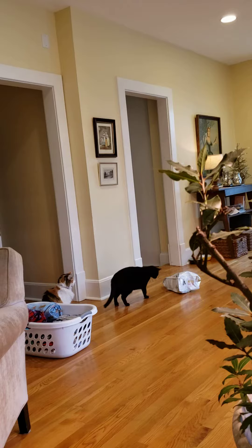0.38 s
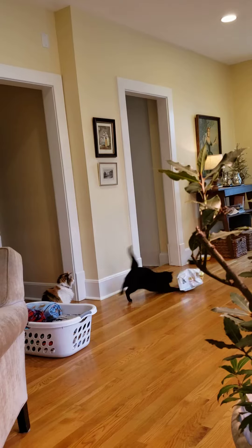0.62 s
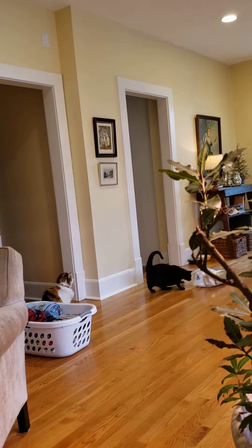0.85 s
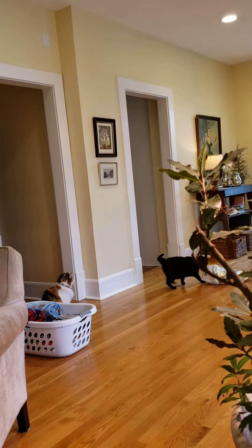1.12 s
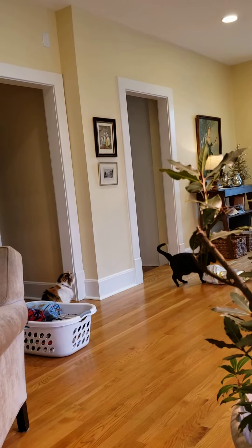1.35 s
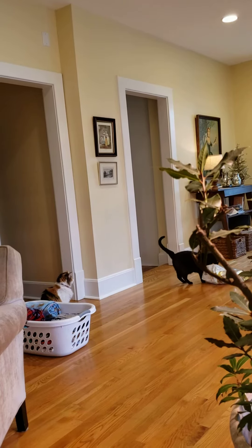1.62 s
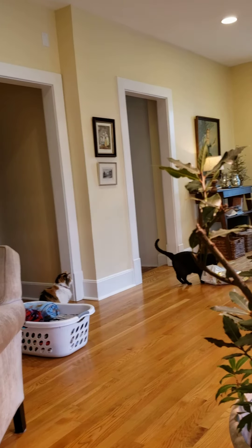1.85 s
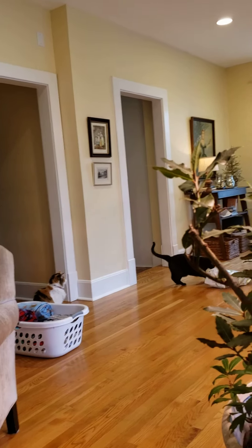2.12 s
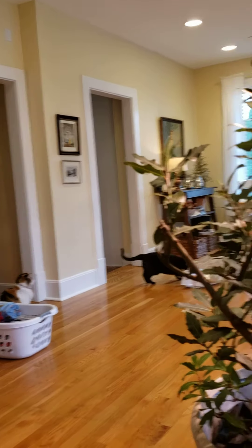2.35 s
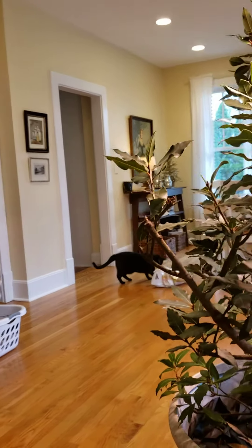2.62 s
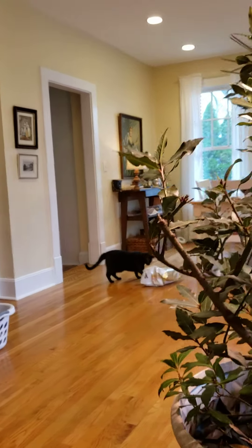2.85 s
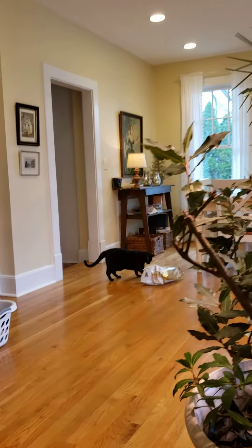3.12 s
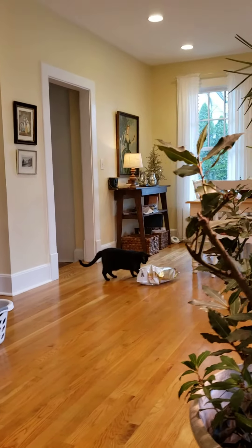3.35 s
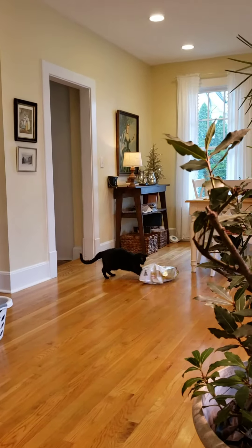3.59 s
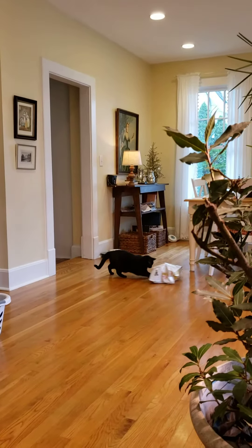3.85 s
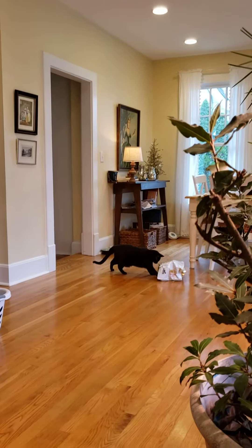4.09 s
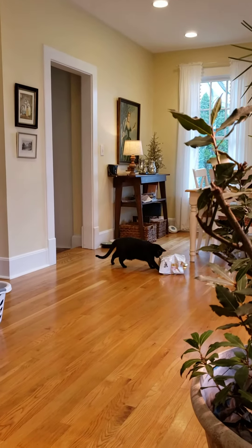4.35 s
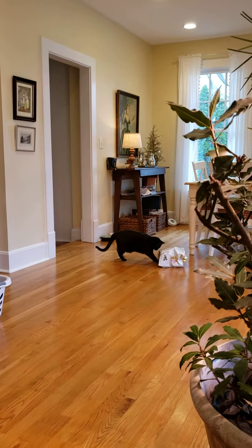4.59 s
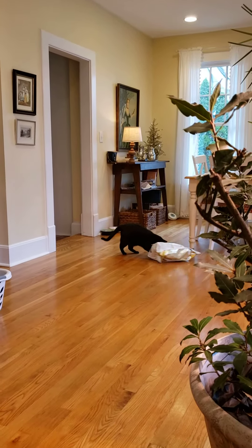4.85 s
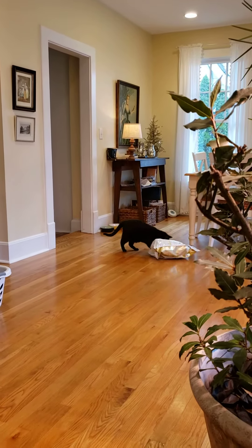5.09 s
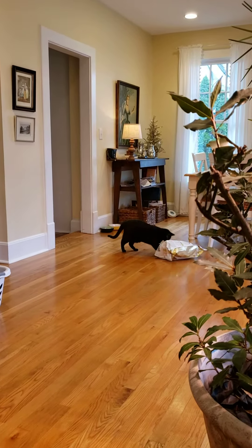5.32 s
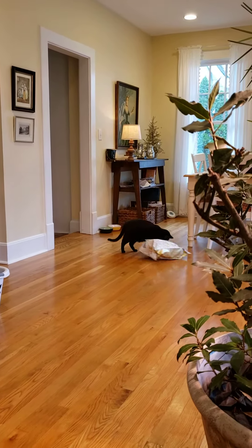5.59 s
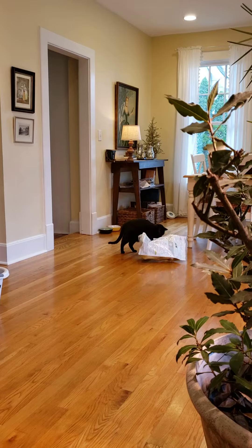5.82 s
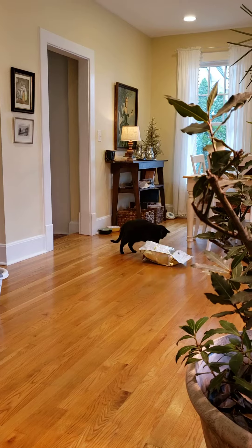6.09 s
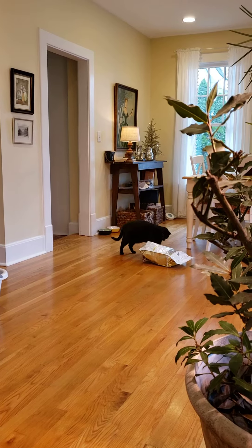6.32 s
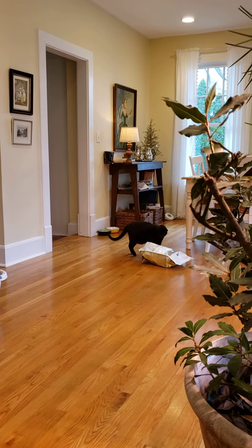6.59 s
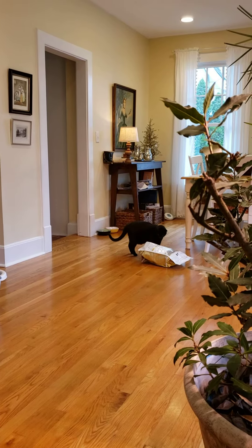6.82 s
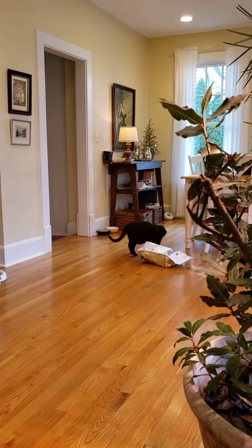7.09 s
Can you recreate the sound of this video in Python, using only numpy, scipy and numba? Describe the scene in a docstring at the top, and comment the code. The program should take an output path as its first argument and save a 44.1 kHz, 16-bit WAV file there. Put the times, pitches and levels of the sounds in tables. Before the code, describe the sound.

Sudden crinkly bursts, snaps and hollow flaps of a film bag batted over floorboards by a cat, with near-quiet gaps over faint house rumble.

```python
"""On the wooden floor of a bare, lively room, a cat pounces on a nearly empty foil-lined food bag and shoves it.
Creases in the film pop by the thousand as short damped rings, the big panels flap and boom, folds snap
under a paw, seams sing as they drag. The room smears the bag with decaying noise echoes; small ringing ticks join.
Beneath lie a house rumble, a low hum in three narrow bands and the microphones' hiss, made of shaped noise.
All of it is heard from a phone some metres off."""
import sys
import numpy as np
from scipy import signal
from scipy.fft import rfft, irfft, next_fast_len
from scipy.io import wavfile
from scipy.ndimage import uniform_filter1d
from numba import njit

SR = 44100
rng = np.random.default_rng(int(sys.argv[2]) if len(sys.argv) > 2 else 0)


def convert_level_to_amplitude(level_db):
    """Map a level in decibels to its linear amplitude factor."""
    exponent = np.asarray(level_db, float) / 20
    return 10 ** exponent


def master_out(mix):
    """Clip the mix to full scale and print it as 16-bit PCM to the path in sys.argv[1]."""
    frames = np.transpose(np.atleast_2d(mix))
    ceiling = np.clip(frames, -1, 1)
    pcm = np.round(ceiling * 32767).astype(np.int16)
    wavfile.write(sys.argv[1], SR, pcm)


N = 317343

# Bag levels are ahead of the room and of the bag's colour.
# The cat hits the bag and the film starts at once. Each row: start in seconds, crackle in dB, push in seconds,
# panel flapping in dB above the crackle, fizz in dB above the crackle before FIZZ_DB is added.
POUNCE_PUSHES = [(.587, -44.5, 0.043, 5, -22.5), (.612, -35.5, .02, 1, -15), (.624, -31, 0.6, -3, -12),
                 (2.023, -30.5, 0.022, 5.5, -21), (2.034, -26.5, 0.023, -8.5, -18),
                 (3.274, -66, 0.023, 17, -11), (3.608, -40, 0.043, 4.5, -1.5), (5.108, -49, 0.034, 4.5, -9),
                 (3.874, -30, 0.16, 0.5, -15), (4.696, -38, .11, 4.5, -7.5), (5.425, -60, 0.063, 2, -8),
                 (5.495, -55, 0.062, 6.5, 1.5), (5.876, -39, 0.11, 2.5, -18),
                 (6.112, -34.5, 0.021, -0.5, -5)]
# The cat leans on the bag or slides it and the film swells. Each row: as for the pounces.
SHOVE_PUSHES = [(.54, -69, 0.055, -9.5, -7), (.76, -38, 0.068, 1.5, -11.5), (.85, -42, 0.23, -4, -12),
                (.93, -48.5, 0.07, 12, -17), (1.1, -55.5, 0.11, 2.5, -4), (1.3, -68.5, 0.089, 9, -5.5),
                (1.5, -78, 0.15, 12, -7), (2.17, -41, 0.23, 2.5, -11), (2.44, -57, 0.17, 9.5, -20),
                (2.64, -75, 0.16, 13, 2), (2.98, -82, 0.062, 19, 2.5), (3.4, -74.5, 0.068, -11, -8),
                (3.52, -64.5, 0.086, -1.5, -5), (3.64, -32.5, 0.076, 0.5, -19.5),
                (3.77, -45.5, 0.085, 4.5, -13), (4.16, -78.5, 0.15, 0.5, 5), (4.635, -44.5, 0.1, 6, -14),
                (4.88, -46, 0.37, 2, -13), (5.2, -61.5, 0.18, 10, -2.5), (5.52, -38, 0.16, -1.5, -13),
                (5.64, -40, 0.16, 2, -19), (5.91, -39.5, 0.17, 3, -15.5), (6.09, -33.5, 0.06, -3, -19.5),
                (6.2, -43.5, 0.058, 1.5, -35), (6.28, -46, 0.095, 3, -16.5), (6.83, -83.5, 0.11, -5, -10)]
# Extra loudness at the start of a pounce. Each entry: layer, lift in dB.
POUNCE_BURST_DB = {"crackle": 7, "panels": -1, "fizz": 7}
# How fast the film falls quiet once the cat lets go. Each entry: layer, loss in dB per second.
LETTING_GO_DB_S = {"crackle": 145.5, "panels": 117, "fizz": 166}
# Large panels of the bag that boom. Each row: pitch in Hz, width in Hz, gain in dB.
BOOMING_PANELS = [(340, 180, 1), (520, 320, 3.5), (643, 64, 18), (930, 23, 14.5)]
# A stiff seam or panel drags on the boards. Each row: start in seconds, level in dB before its fade,
# length in seconds, pitch in Hz.
SEAM_DRAGS = [(0.616, -42, 0.19, 2420), (.635, -41.5, 0.037, 1540), (.745, -37, .035, 1000),
              (.795, -36.5, .05, 606), (0.883, -48, 0.19, 2440), (.94, -41, .05, 427),
              (3.88, -44, .07, 930), (4.5, -73, .07, 1810), (5.92, -47.5, 0.089, 417),
              (6.113, -47.5, 0.054, 900), (6.273, -44, 0.13, 2470)]
# Paw blows and folds that snap. Each row: start in seconds, snap level in dB, ring pitch in Hz,
# ring t60 in seconds, thud in dB above the snap level.
FOLD_SNAPS = [(.589, -37.5, 676, .007, 3), (0.612, -31, 1460, 0.0065, -3.5), (.624, -24, 1500, .006, -6),
              (0.679, -12, 5720, 0.0033, -29), (.899, -30, 2480, 0.0095, -18),
              (1.349, -43, 5180, 0.0019, -12.5), (2.023, -23, 1520, 0.0039, 1),
              (2.042, -21.5, 340, 0.024, -7.5), (2.047, -17, 602, 0.0066, -4.5),
              (2.088, -27, 330, 0.018, -9), (2.525, -34, 1800, 0.008, -12), (2.67, -41.5, 5600, .003, -19),
              (2.836, -45.5, 6000, .003, -17), (3.275, -54, 2460, 0.03, -15),
              (3.607, -23, 920, 0.003, -15.5), (3.702, -26.5, 1510, .004, -9),
              (3.877, -17.5, 930, 0.024, -18), (4.699, -17, 4730, 0.0019, -13),
              (4.702, -24.5, 520, .015, -11.5), (5.11, -26, 850, 0.011, -29),
              (5.426, -32.5, 5640, 0.005, -14.5), (5.496, -33, 5825, 0.0034, -30),
              (5.878, -24, 3970, 0.0042, -16.5), (6.113, -17, 1046, 0.0038, -19),
              (6.282, -32, 2370, 0.007, -25)]
# The bag's air under a paw. Each row: pitch in Hz, gain in dB, t60 in seconds.
AIR_MODES = [(255, 7, 0.05), (359, 4, 0.024), (470, -5.5, 0.013)]
# The cat lands on the boards. One row: start in seconds, peak in dB, pitch in Hz, t60 in seconds.
CAT_LANDING = (2, -28.5, 91.5, 1.06)
# Colour of bag, path and microphone together. Each row: frequency in Hz, gain in dB on evenly bright sound.
BAG_COLOUR = [(59, -25.5), (100, -3.5), (140, -12), (219, -4), (255, -6), (398, -2), (736, -7), (891, -6.5),
              (1330, -7), (2270, -7), (3190, -10.5), (7140, -12.5), (9020, -27.5), (15000, -29.5),
              (16000, -28.5)]
# Stereo place of the bag. Each row: frequency in Hz, left minus right in dB.
BAG_BALANCE = [(110, 1), (380, -0.5), (700, 2.5), (2380, 0.5), (6000, 4.5), (9500, 3.5), (13000, 6)]
# Decay of the room. Each row: frequency in Hz, t60 in seconds.
ROOM_DECAY = [(125, 0.36), (300, 0.27), (700, 0.56), (1500, 0.49), (3500, 0.43), (8000, 0.26),
              (14000, 0.35)]
# How alike left and right are. Each row: frequency in Hz, likeness from 0 to 1.
STEREO_LIKENESS = [(60, 0.95), (130, 0.98), (290, 0.88), (640, 0.27), (1410, 0)]
# Signs of the left and right channels.
LEFT_RIGHT = np.array([[1], [-1]])
# Small ticks and a hollow knock. Each row: start in seconds, level in dB before the swell is taken off,
# ring pitch in Hz, ring t60 in seconds.
SMALL_TICKS = [(3.271, -49, 875, .12), (3.274, -54, 420, .1), (3.382, -53.5, 5040, .004),
               (6.8345, -62.5, 9000, 0.0023), (6.8345, -60, 3600, 0.0056), (6.8405, -56.5, 5200, .005),
               (6.84, -58, 1000, 0.0063), (6.8495, -59, 5500, .005), (6.8495, -60.5, 7200, .004)]
# Colour of the house rumble. Each row: frequency in Hz, gain in dB.
RUMBLE_COLOUR = [(25, -30), (53, -12), (129, -12.5), (162, -15.5), (224, -16.5), (415, -22), (694, -29),
                 (1500, -55), (1950, -100)]
# Narrow humming bands. Each row: pitch in Hz, width in Hz, level in dB.
HUM_BANDS = [(58, 22, -58.5), (131, 6, -70), (218, 2.4, -63)]
# Colour of the microphones' hiss. Each row: frequency in Hz, gain in dB.
HISS_COLOUR = [(880, -37), (1500, -5), (2510, -11), (2800, -14), (5380, -19.5), (7240, -4), (8320, -22.5),
               (12700, -12), (16000, -15)]
# Stereo place of the background. Each row: frequency in Hz, left minus right in dB.
HOUSE_BALANCE = [(60, 0), (380, -1), (700, 4), (1290, 1), (4400, -4), (7500, 13.5), (10000, -0.5),
                 (15000, -3)]

FIZZ_DB = 11.5  # above the crackle, ahead of the dull path to the phone


def level(x, db):
    """Scale to an rms level."""
    return x * convert_level_to_amplitude(db) / np.sqrt(np.mean(x ** 2))


def lookup(table, hz):
    """Read (Hz, value) points on a log-frequency axis."""
    f, v = np.transpose(table)
    return np.interp(np.log(np.maximum(hz, 1)), np.log(f), v)


def shape(x, gain_at):
    """Filter by a gain given as a function of Hz."""
    size = 2 * next_fast_len(x.shape[-1] // 2 + 1)
    gain = gain_at(np.fft.rfftfreq(size, 1 / SR))
    return irfft(rfft(x, size) * gain, size)[..., :x.shape[-1]]


def peak(hz, centre_hz, width):
    """Gain of one resonance."""
    return 1 / np.sqrt(1 + (2 * (hz - centre_hz) / width) ** 2)


def causal(gain):
    """Give a gain curve the phase of a filter that cannot ring before it is struck."""
    cepstrum = irfft(np.log(gain))
    half = cepstrum.shape[-1] // 2
    cepstrum[..., 1:half] *= 2
    cepstrum[..., half + 1:] = 0
    return np.exp(rfft(cepstrum))


@njit
def rings(size, start, hz, t60, gain):
    """Sum of short damped sine rings."""
    out = np.zeros(size)
    for k in range(len(start)):
        p, z = np.exp((2j * np.pi * hz[k] - np.log(1000) / t60[k]) / SR), gain[k] + 0j
        for i in range(start[k], min(start[k] + int(t60[k] * SR), size)):
            out[i] += z.imag
            z *= p
    return out


def bag():
    """Crackle, fizz and flapping follow the cat's effort; drags, snaps, thuds and a landing sit on top."""
    crackle = pops(count=20000, low_hz=1115.0, high_hz=8550.0, cycles=2.55, scatter_db=4.0)
    fizz = pops(count=12000, low_hz=7410.0, high_hz=16500.0, cycles=4.3, scatter_db=4.5)
    flap = pops(count=5000, low_hz=118.6, high_hz=1220.0, cycles=3.3, scatter_db=2.5)
    panels = flap + level(boom(crackle + flap), -11.5)
    rustle = effort("crackle") * clumps() * crackle
    rustle = rustle + effort("panels") * clumps() * panels
    rustle = rustle + effort("fizz") * convert_level_to_amplitude(FIZZ_DB) * fizz
    return rustle + scrapes(crackle + flap) + snaps() + thuds() + landing()


def pops(count, low_hz, high_hz, cycles, scatter_db):
    """Film buckling at random: each pop has its own pitch and size, a few much bigger; rms 1."""
    when, pitch, size, sign = rng.random((count, 4)).T
    hz = low_hz * (high_hz / low_hz) ** pitch
    gain = convert_level_to_amplitude(-scatter_db * np.log(1.004 - size)) * np.sign(sign - .5) * np.sqrt(hz)
    return level(rings(N, (when * N).astype(np.int64), hz, cycles / hz, gain), 0)


def boom(film):
    """Any movement of the film also rings the bag's larger panels."""
    return shape(film, lambda hz: sum(convert_level_to_amplitude(db) * peak(hz, f, w) for f, w, db in BOOMING_PANELS))


def effort(layer):
    """Gain of one layer of the film: every push rises, sags and settles; their powers add."""
    swell_share, swell_db = 0.37, 5.5  # a shove grows by this many dB over this share of its push
    t, power = np.arange(N) / SR, 0
    coarse_t = t[::32]
    for table, sudden in ((POUNCE_PUSHES, True), (SHOVE_PUSHES, False)):
        for s, db, push_s, panels_db, fizz_db in table:
            above_db = {"crackle": 0, "panels": panels_db, "fizz": fizz_db}[layer]
            rise_s = 0.0034 if sudden else swell_share * push_s
            lead_s = rise_s if sudden else 0.033  # first touch before the push takes hold
            sag_db = (60 if sudden else 16) * max(push_s - rise_s, 0)  # dB per second while the cat pushes
            burst_s = min(0.016, (push_s - rise_s) / 2)
            times = np.cumsum([s - lead_s, lead_s, rise_s, burst_s, push_s - rise_s - burst_s + 1e-4, 1])
            course_db = [-60, -swell_db, sudden * POUNCE_BURST_DB[layer], 0,
                         -sag_db, -sag_db - LETTING_GO_DB_S[layer]]
            power = power + convert_level_to_amplitude(db + above_db + np.interp(coarse_t, times, course_db)) ** 2
    return np.interp(t, coarse_t, np.sqrt(power))


def clumps():
    """Uneven gain: creases give way in clumps, so pops bunch up and thin out; rms 1."""
    size = int(.012 * SR)
    steps = np.repeat(rng.standard_normal(N // size + 1), size)
    return level(convert_level_to_amplitude(2 * uniform_filter1d(steps, size // 4)[:N]), 0)


def scrapes(film):
    """Each drag lets the film's pops through one resonance and fades."""
    width_share, fade_db = .4, 11  # band width as a share of its pitch; loss over the length
    out = np.zeros(N)
    for s, db, d, f in SEAM_DRAGS:
        a, size = int(s * SR), int(d * SR)
        band = shape(film[a:a + size], lambda hz: peak(hz, f, width_share * f) ** 2)
        out[a:a + size] += level(band, db) * convert_level_to_amplitude(-fade_db * np.arange(size) / size)
    return out


def snaps():
    """A fold gives way in a few quick steps, each at a slightly different pitch, behind a broad click."""
    when, db, hz, t60, _ = np.transpose(FOLD_SNAPS)
    start = (when * SR).astype(np.int64)
    one = np.ones(len(when))
    late, bend = rng.random((len(when), 2, 4)).transpose(1, 2, 0)
    out = rings(N, start, 7200.0 * one, 0.00086 * one, convert_level_to_amplitude(db + 8.5))  # a few cycles at most: a click
    for k, (a, b) in enumerate(zip(late, bend)):
        step_start = start + (k * .004 * SR * a).astype(np.int64)
        step_hz = hz * (1 + 0.083 * (b - .5))
        out = out + rings(N, step_start, step_hz, np.maximum(t60, .002), convert_level_to_amplitude(db - 1.0 - 1.5 * k))
    return out


def thuds():
    """The bag's air rings low under each blow, detuned as the bag changes shape."""
    when, db, _, _, thud_db = np.transpose(FOLD_SNAPS)
    start = (when * SR).astype(np.int64)
    one = np.ones(len(when))
    detune = 1 + .06 * rng.standard_normal((len(when), 3)).T
    return sum(rings(N, start, f * d, t * one, convert_level_to_amplitude(db + thud_db + g))
               for (f, g, t), d in zip(AIR_MODES, detune))


def landing():
    """The boards ring at one low pitch as the cat lands."""
    s, peak_db, f, t60 = np.array(CAT_LANDING)[:, None]
    return rings(N, (s * SR).astype(np.int64), f, t60, convert_level_to_amplitude(peak_db))


def spread(x, count, hop_s):
    """Different parts of the bag sound in turn, each heard through an echo pattern of its own."""
    turn, wet = np.arange(N) / SR / hop_s, 0
    for k in range(count):
        away = (turn - k + count / 2) % count - count / 2
        part = x * np.cos(np.pi / 2 * np.clip(away, -1, 1))
        wet = wet + signal.fftconvolve(part[None], room(), axes=1)[:, :N]
    return wet


def room():
    """Echo pattern: the direct sound, then a dense noise tail whose decay depends on pitch."""
    size = int(.75 * SR)
    t = np.arange(size) / SR
    noise, tail = pair(size), 0
    for centre in 62.5 * 2. ** np.arange(9):
        octaves = lambda hz: np.log2(np.maximum(hz, 1) / centre)
        band = shape(noise, lambda hz: np.cos(np.pi / 2 * np.clip(octaves(hz), -1, 1)) ** 2)
        tail = tail + band * convert_level_to_amplitude(-60 * t / lookup(ROOM_DECAY, centre))
    tail = tail * (1 - np.exp(-t / 0.00067))  # reflections pile up in the first moments
    tail = tail / np.sqrt(np.sum(tail ** 2) / 2)
    direct = np.zeros((2, size))
    direct[[0, 1], rng.integers(0, 8, 2)] = 1
    # the straight path favours the bass, which the floor reinforces
    bass = signal.lfilter(*signal.butter(1, 600, fs=SR), direct)
    return tail + convert_level_to_amplitude(-9.5) * direct + convert_level_to_amplitude(-8) * bass


def pair(size):
    """Two noises, nearly the same in the bass and unrelated in the treble."""
    mid, side = rng.standard_normal((2, size))
    like = lambda hz: np.clip(lookup(STEREO_LIKENESS, hz), 0, 1)
    shared = shape(mid, lambda hz: np.sqrt(1 + like(hz)))
    return shared + LEFT_RIGHT * shape(side, lambda hz: np.sqrt(1 - like(hz)))


def ticks():
    """Brief rings that swell in a moment, heard bare and again through the room."""
    when, db, hz, t60 = np.transpose(SMALL_TICKS)
    start = (when * SR).astype(np.int64)
    # taking off a faster-dying copy softens the attack
    bare = rings(N, start, hz, t60, convert_level_to_amplitude(db)) - rings(N, start, hz, 0.12 * t60, convert_level_to_amplitude(db))
    return bare + convert_level_to_amplitude(-1) * signal.fftconvolve(bare[None], room(), axes=1)[:, :N]


def house():
    """House rumble, narrow humming bands and microphone hiss, all filtered from one noise pair."""
    noise = pair(N)
    rumble = level(shape(noise, lambda hz: convert_level_to_amplitude(lookup(RUMBLE_COLOUR, hz))), -56.5)
    hiss = level(shape(noise, lambda hz: convert_level_to_amplitude(lookup(HISS_COLOUR, hz))), -78.5)
    hum = sum(level(shape(noise, lambda hz: peak(hz, f, w) ** 2), db) for f, w, db in HUM_BANDS)
    return shape(rumble + hum + hiss, lambda hz: convert_level_to_amplitude(LEFT_RIGHT * lookup(HOUSE_BALANCE, hz) / 2))


def scene():
    """The bag heard through the room, with small ticks, over the house."""
    wet = spread(bag(), count=12, hop_s=.02)
    # pops spread evenly over octaves fall 3 dB an octave; this evens them out
    slope_db = lambda hz: 10 * np.log10(np.maximum(hz, 100) / 400)
    balance_db = lambda hz: LEFT_RIGHT * lookup(BAG_BALANCE, hz) / 2
    colour = lambda hz: causal(convert_level_to_amplitude(lookup(BAG_COLOUR, hz) + slope_db(hz) + balance_db(hz)))
    return shape(wet, colour) + ticks() + house()


def top_cut(x):
    """Nothing passes above the cut-off."""
    return signal.sosfilt(signal.butter(12, 16590, fs=SR, output="sos"), x)


def record(dry):
    """The phone cuts the top with a steep low-pass at 15850 Hz."""
    low_pass = signal.ellip(10, .2, 70, 15850, fs=SR, output="sos")
    mix = signal.sosfilt(low_pass, dry)
    return top_cut(mix)


dry = scene()
out = record(dry)
master_out(out)
```